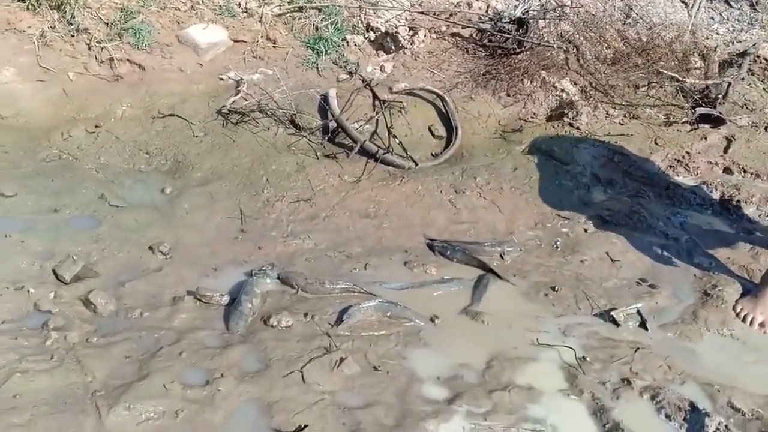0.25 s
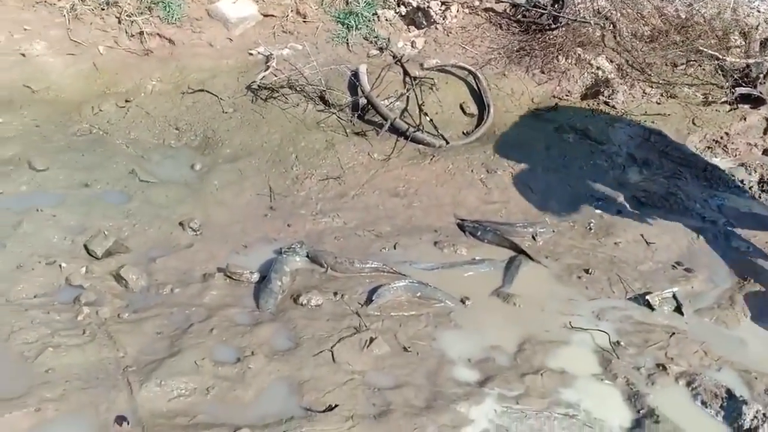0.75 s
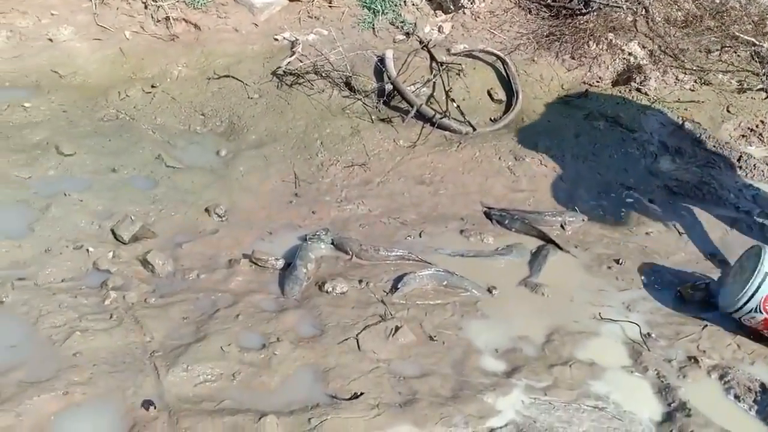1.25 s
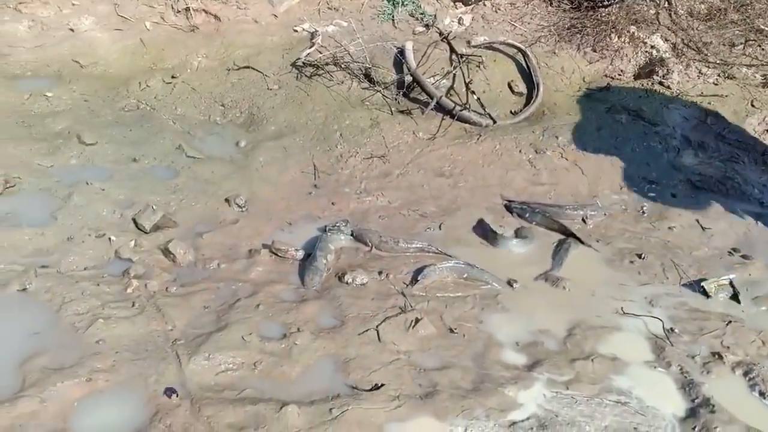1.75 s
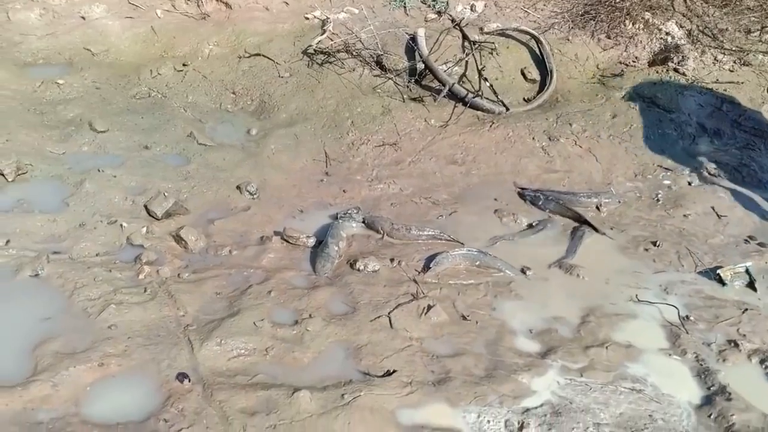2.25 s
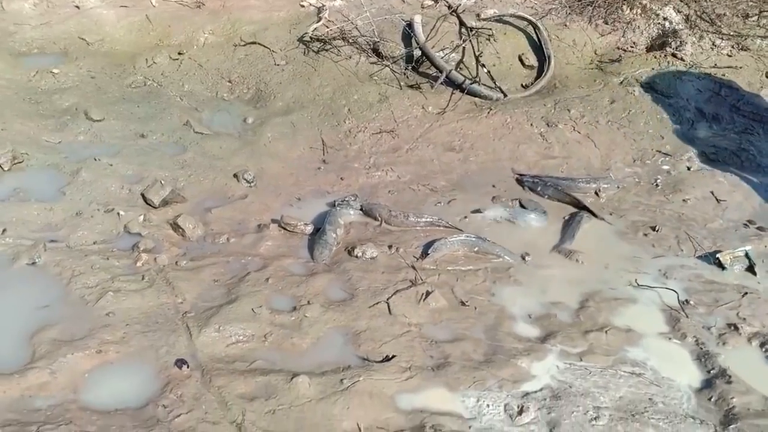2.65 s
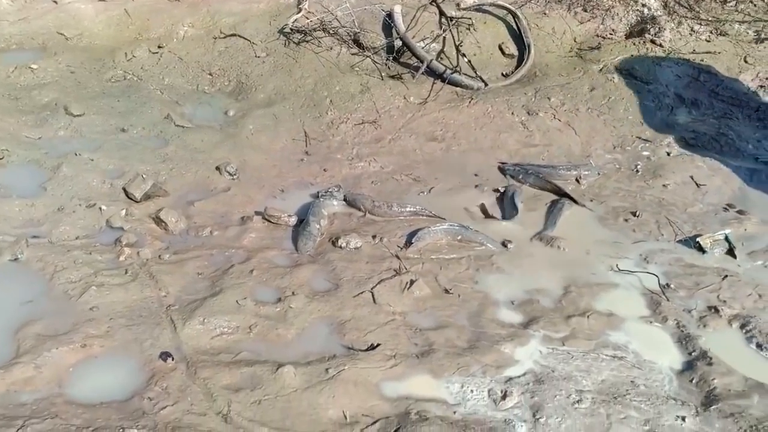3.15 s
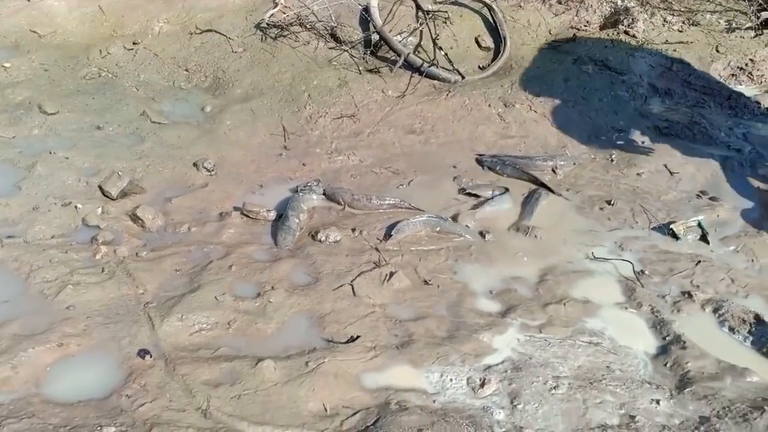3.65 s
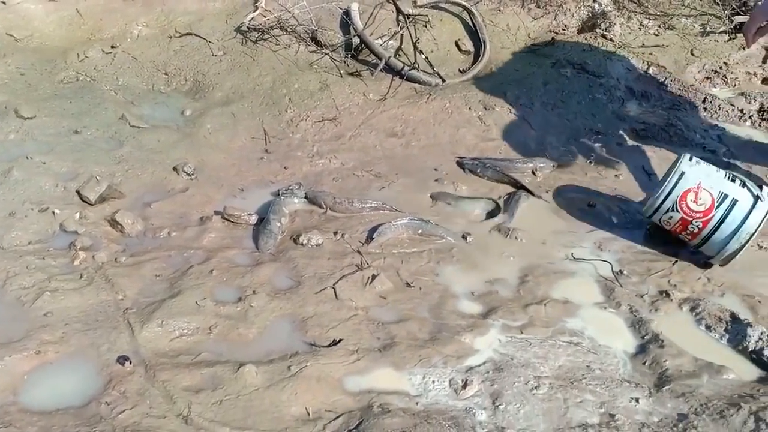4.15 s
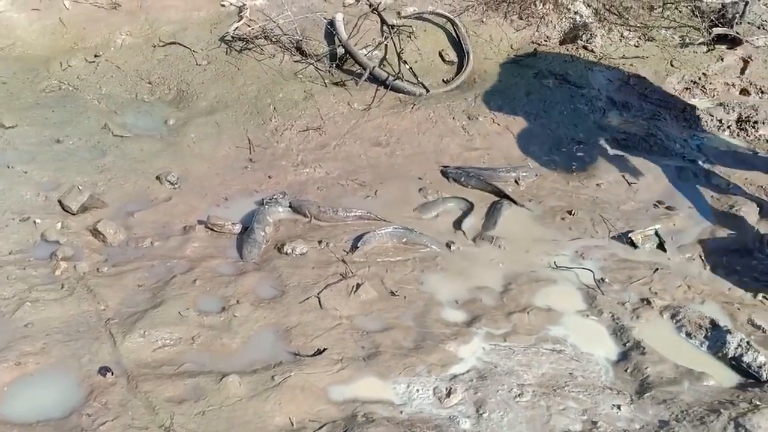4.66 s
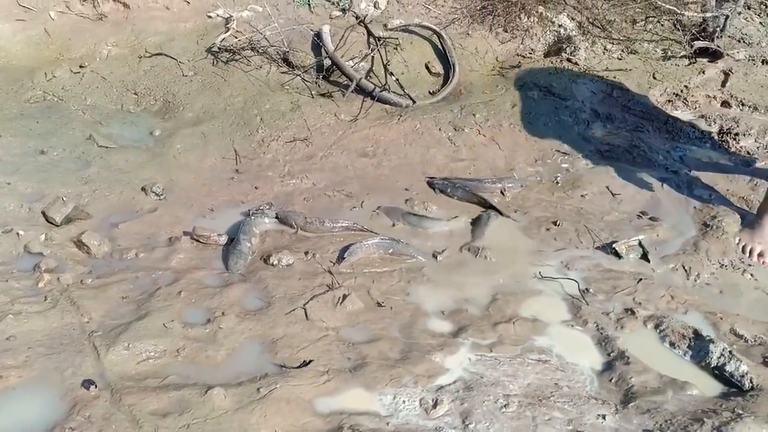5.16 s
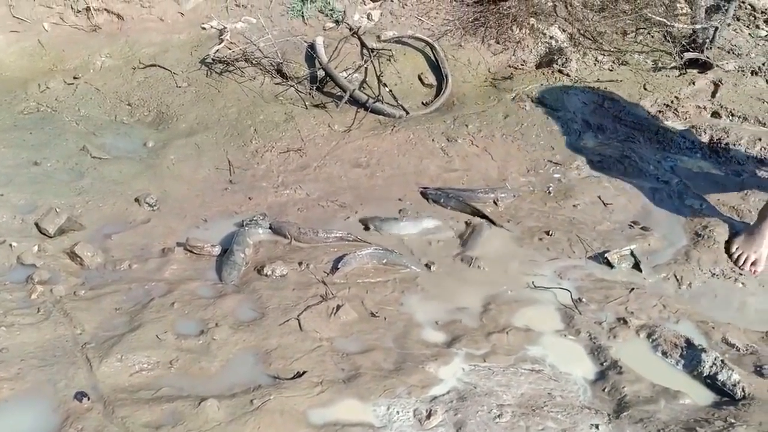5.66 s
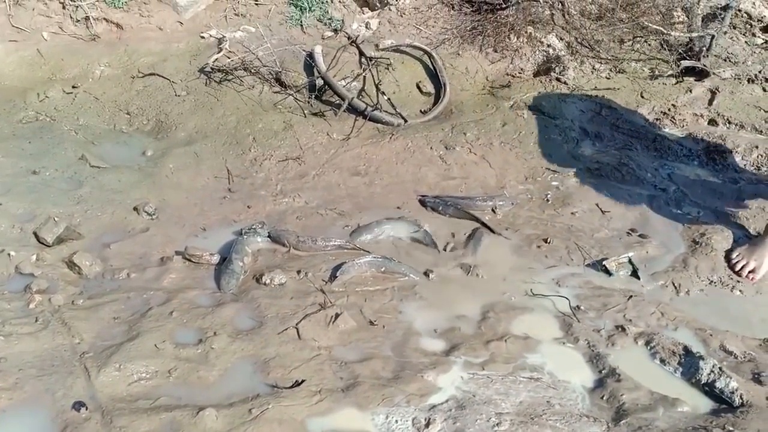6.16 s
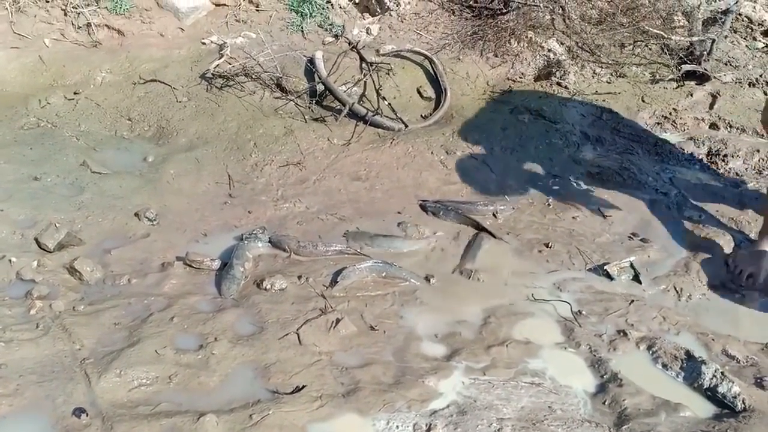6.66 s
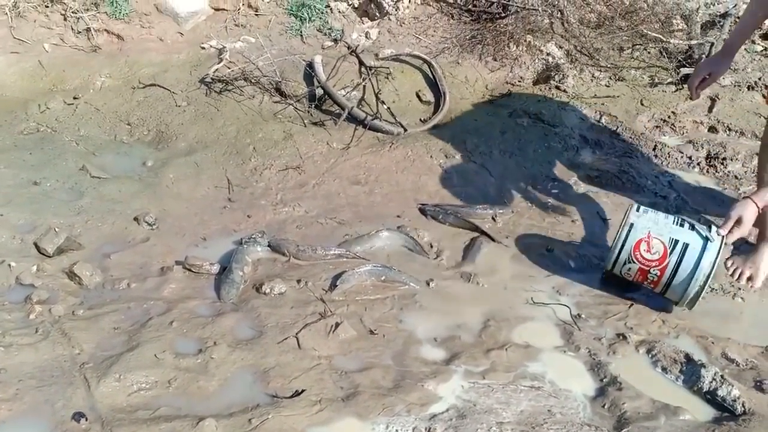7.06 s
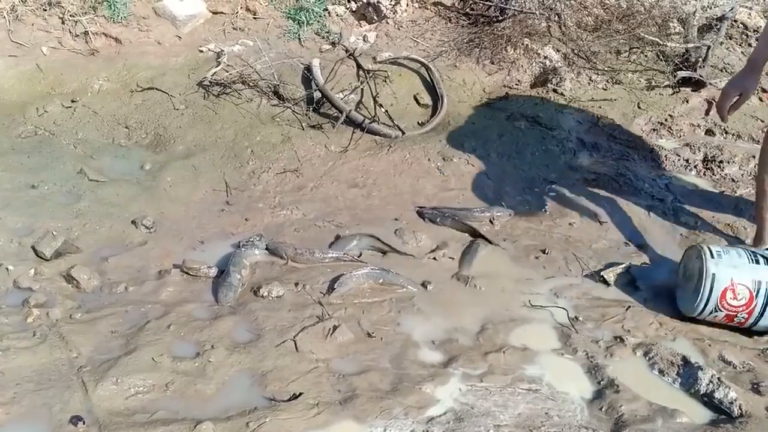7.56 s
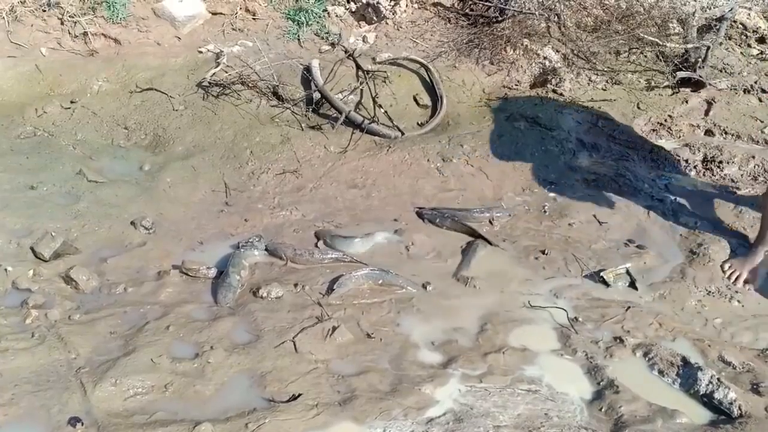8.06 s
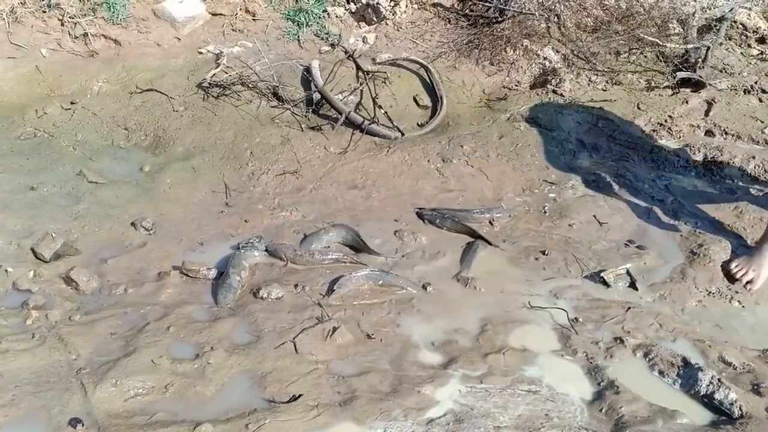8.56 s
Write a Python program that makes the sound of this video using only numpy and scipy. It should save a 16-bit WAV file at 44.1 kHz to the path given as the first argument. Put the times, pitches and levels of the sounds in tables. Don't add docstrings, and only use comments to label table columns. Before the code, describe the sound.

Close outdoor stereo pickup of someone bailing muddy water with a plastic bucket. Tail-end drips and rim knocks come first, then a hollow dragging scoop with gurgles, a wet throw spattering on mud, a sudden sharp plunge, the loudest moment, another pattering throw, a faint bird whistle, a slower third fill and the start of a last throw. Low, soft breeze rumble throughout.

```python
import sys
import numpy as np
from scipy import signal
from scipy.fft import rfft, irfft, next_fast_len
from scipy.io import wavfile
from scipy.ndimage import uniform_filter1d, map_coordinates

SR = 44100
rng = np.random.default_rng(int(sys.argv[2]) if len(sys.argv) > 2 else 0)


def rack_gain(trim_db):
    fader = np.asarray(trim_db, float)
    return 10 ** (fader / 20)


def to_wav(sig):
    pcm = np.clip(np.atleast_2d(sig), -1, 1) * 32767
    pcm = np.round(pcm).astype(np.int16)
    wavfile.write(sys.argv[1], SR, pcm.T)


N = 388080

# time_s, level_db
BREEZE = [(0.0, -52), (0.51, -62.5), (1.3, -61.5), (1.86, -58), (2.15, -61.5), (2.79, -58.5), (2.99, -54),
          (3.31, -57), (3.9, -48), (4.19, -50.5), (4.9, -52.5), (5.54, -57.5), (5.91, -51), (6.2, -56),
          (6.69, -51), (7.97, -55), (8.21, -58), (8.8, -54)]
# freq_hz, density_db
RUMBLE_SPECTRUM = [(12, -82), (20, -30), (22, -45), (59, -12), (92, -1), (221, -1), (264, -10),
                   (330, -23.5), (430, -27), (730, -120)]
# freq_hz, density_db
BUFFET_SPECTRUM = [(20, -33), (45, -6), (75, -0.5), (110, -5.5), (150, -20), (300, -66.5)]
# freq_hz, density_db
MURMUR_SPECTRUM = [(150, -25), (250, -4.5), (320, -6.5), (355, -9.5), (472, -8.5), (738, -12.5),
                   (1300, -35), (1690, -50), (2860, -120)]
# freq_hz, density_db
HISS_SPECTRUM = [(590, -48), (1000, -1), (1420, -4.5), (2340, 2.5), (3400, -8), (4710, -10), (5880, -14),
                 (6530, -13), (9590, -20), (11400, -14.5), (13000, -20), (14100, -22), (16200, -14)]
# time_s, pitch_hz, level_db
WHISTLE = [
    (6.705, 2880, -85),
    (6.725, 2880, -72),
    (6.84, 2820, -69.5),
    (6.86, 2870, -90),
]
# start_s, peak_db, pitch_hz
TICKS = [(0.4708, -51.5, 5780), (0.558, -52, 2800), (1.0, -56, 5700), (2.366, -54, 2380),
         (4.512, -34.5, 7100), (4.955, -55, 5460), (3.36, -60, 2980), (0.6195, -47, 4630),
         (1.0904, -20, 5880), (1.495, -36, 5000), (1.734, -63, 4060), (1.8961, -46, 5650),
         (1.913, -46, 3650), (3.1955, -38, 5140), (3.671, -41.5, 2760), (3.72, -54, 4000),
         (4.243, -29, 5800), (4.5564, -28.5, 4270), (4.6458, -47.5, 4070), (4.8249, -52, 5700),
         (5.9414, -50, 6200), (6.1075, -53, 5000), (5.533, -50.5, 5930), (5.795, -50, 6100),
         (5.6, -47, 5840), (5.77, -46, 5800), (2.815, -48, 5800), (2.964, -38, 5900), (2.725, -44, 5000),
         (6.1707, -53, 4930), (6.2836, -58, 5570), (7.757, -51.5, 5000), (7.977, -49.5, 6900),
         (8.4103, -62, 4900), (8.744, -38, 5930)]
# start_s, peak_db, pitch_hz, t60_s
BUBBLES = [(1.115, -21, 316, 0.072), (1.1, -28, 315, 0.066), (1.704, -20, 415, 0.019),
           (1.751, -19, 294, 0.054), (1.763, -25.5, 332, 0.097), (1.755, -37, 235, .07),
           (1.118, -26.5, 245, 0.043), (4.043, -32, 307, 0.055), (2.304, -37.5, 344, 0.054),
           (2.895, -35, 332, 0.079), (3.637, -21, 1056, 0.046), (4.687, -32, 325, 0.11),
           (7.174, -33, 640, 0.04), (7.214, -30, 510, 0.021), (7.602, -29, 1190, .08),
           (7.603, -31, 796, .04), (0.12, -44, 1300, 0.037), (1.092, -16.5, 1080, 0.033),
           (4.045, -9, 1076, 0.015), (4.246, -15, 1130, 0.034), (7.009, -30, 1090, 0.049),
           (7.389, -33, 1080, 0.047), (7.606, -33.5, 448, 0.064), (1.113, -21, 1705, .05),
           (1.104, -22, 2370, .07), (1.107, -26, 560, 0.026), (1.1, -29, 1880, 0.065),
           (4.246, -27.5, 530, 0.059), (4.244, -26, 1800, 0.067), (6.405, -38, 713, 0.071),
           (4.041, -25, 474, 0.046), (1.705, -25, 710, 0.02), (1.752, -25.5, 490, 0.026)]
# start_s, peak_db, pitch_hz, t60_s, climb_share
CHIRPS = [
    (6.199, -29.5, 900, 0.035, 0.7),
    (6.614, -42.5, 1050, 0.09, 0.23),
    (7.479, -54, 1140, 0.15, .5),
]
# start_s, peak_db, pitch_hz
DROPS = [(0.3546, -32, 2330), (1.2251, -30, 2180), (1.4511, -25.5, 2270), (2.585, -40, 2390),
         (2.6353, -27, 3156), (2.7255, -36.5, 2450), (2.7604, -26, 2070), (2.7886, -30.5, 2380),
         (2.8135, -36, 2260), (2.881, -31.5, 1710), (2.9114, -29, 2040), (2.9327, -40, 2340),
         (2.9447, -26, 2360), (2.962, -27, 2400), (3.098, -47, 2450), (3.1552, -50, 2220),
         (4.2433, -12.5, 2275), (4.3824, -35, 2150), (4.4877, -39, 2520), (4.5116, -34, 2360),
         (4.5384, -24, 2210), (5.5882, -39, 2430), (5.6256, -27, 2500), (5.713, -43, 2440),
         (5.7803, -39, 1990), (5.7947, -32, 2120), (5.8247, -42, 2100), (5.8606, -33, 2090),
         (5.8754, -35, 2160), (5.8947, -34, 2050), (5.9236, -40.5, 2030), (5.9836, -38, 2070),
         (6.032, -37.5, 2120), (6.0731, -38, 2100), (6.117, -40, 2200), (6.1444, -42.5, 2150),
         (6.1724, -38.5, 2230), (7.1847, -42, 2340), (7.233, -35, 2290), (7.2644, -29, 1660),
         (7.3165, -30.5, 2180), (7.3457, -34, 2380), (7.444, -42, 2170), (7.4774, -39, 2200),
         (8.5824, -50, 2410), (8.5949, -37.5, 2370), (8.631, -34.5, 1770), (8.6597, -53, 1980),
         (8.6955, -39, 2430), (8.7735, -50, 2030)]
# start_s, peak_db, pitch_hz
GURGLES = [(1.17, -32.5, 604), (1.203, -29, 490), (1.336, -35, 1320), (1.39, -49, 490), (1.436, -48, 660),
           (1.471, -37, 751), (1.497, -32, 324), (1.542, -38.5, 398), (1.614, -35, 310), (1.641, -33, 810),
           (1.674, -43, 743), (1.862, -41, 285), (4.304, -47, 398), (4.725, -40, 336), (6.0, -41, 614),
           (6.094, -42, 694), (7.045, -31, 1050), (7.099, -48, 1060), (7.143, -33, 1070),
           (7.185, -35.5, 353), (7.261, -35, 711), (7.35, -43, 655), (7.439, -48, 280), (7.527, -48, 296),
           (7.577, -45, 502)]
# start_s, peak_db, crack_db, t60_s
THUDS = [
    (1.1145, -16, -23, 0.068),
    (1.702, -26, -23, 0.019),
    (1.75, -27.5, -16, 0.024),
    (2.7877, -41.5, -19, 0.068),
    (4.0343, -28, 2.5, 0.11),
    (4.0412, -22.5, -2, 0.06),
    (4.2304, -26.5, 3, 0.015),
    (7.6021, -26.5, -21, 0.063),
]
# start_s, peak_db, crack_db, t60_s
KNOCKS = [(.2773, -37.5, 5.5, 0.016), (.7075, -28.5, -27, 0.13), (.7168, -28, -10, 0.069),
          (1.0984, -23, -29, 0.066), (1.1076, -14.5, -11, 0.028), (1.2251, -24, -16, 0.09),
          (1.3379, -28.5, -15, 0.13), (1.4672, -29, -4, 0.051), (1.5397, -30, -1.5, 0.048),
          (1.6752, -36.5, -11, .038), (2.9337, -32.5, -9, 0.07), (2.9612, -27, -14, 0.044),
          (3.0011, -31.5, -17, 0.11), (3.4441, -26, -12, 0.11), (4.1555, -32.5, -10, 0.057),
          (4.1769, -35.5, -2, 0.035), (4.2421, -22.5, -13, 0.11), (4.2429, -19, -8, 0.03),
          (4.3824, -32, -27, 0.02), (4.4155, -28.5, -3, 0.029), (4.5296, -28, 0, 0.15),
          (6.0107, -35, -12.5, 0.043), (6.4051, -28, -20, 0.1), (7.0103, -24, 8, 0.0091),
          (7.0163, -27, -8, .11), (7.0479, -28.5, -35, 0.055), (7.1437, -47.5, 10, 0.058),
          (7.225, -29, -11, 0.05), (7.862, -47.5, -30, 0.056), (7.655, -41, -15, .04),
          (7.687, -39, -18, .04), (1.616, -38.5, -14, .04), (4.213, -41, -8, .04)]
# start_s, peak_db, crack_db, t60_s
SPLATS = [(.3546, -40, 2, 0.015), (.381, -50, 12, .09), (3.64, -50, 5, .05), (3.72, -55, 8, .04),
          (4.34, -40, -4, .1), (5.655, -45, 3, .05), (1.067, -44, 6, 0.053), (1.091, -18, -5, 0.02),
          (1.4374, -33, -5, 0.061), (1.451, -29, -2, 0.07), (2.5384, -38, -13, 0.043),
          (2.8569, -32, -27, 0.025), (2.8954, -31, -11, 0.062), (2.9557, -20, -4, 0.019),
          (3.031, -33.5, -12, 0.15), (3.0729, -36, -4, 0.041), (3.2871, -56.5, 29, 0.011),
          (4.4407, -35, 1, 0.04), (4.774, -37, -31.5, 0.032), (5.2475, -40, -3.5, 0.036),
          (5.6058, -42, 2, 0.077), (5.627, -55, -25, 0.038), (5.6517, -38, -22, 0.03),
          (5.8557, -35, -35, 0.024), (5.8792, -29.5, -27, 0.027), (6.0516, -32, -27.5, 0.041),
          (7.2644, -30.5, 6.5, 0.035), (7.305, -30.5, -15, 0.22), (7.5472, -31.5, 0, 0.19)]
# freq_hz, width_hz, level_db
BUCKET_MODES = [(324, 156, -33), (532, 410, -3), (712, 270, 9), (1000, 200, 4.5)]
# freq_hz, density_db
WET_SPECTRUM = [(760, -33.5), (1300, -10), (1510, -11), (2040, -2.5), (2420, -2), (2730, -6.5), (3220, -15),
                (4000, -19.5), (5200, -20), (8800, -120)]
# freq_hz, density_db
SPRAY_SPECTRUM = [(1940, -9.5), (3300, 0.5), (3800, -9), (4080, -10.5), (4700, -1.5), (5220, 1), (5810, 0),
                  (6820, -9.5), (7580, -18.5), (10000, -27), (12300, -24), (14800, -11), (15700, -38),
                  (16200, -44)]
# freq_hz, density_db
SCRAPE_SPECTRUM = [(300, -21.5), (550, -3), (720, -5.5), (880, -9), (1080, -5), (1400, -3.5), (1900, -26)]
# time_s, flow_db
SCOOPS = [
    [(1.08, -75), (1.14, -62.5), (1.236, -54), (1.27, -54), (1.36, -54.5), (1.63, -59), (1.78, -63.5),
     (1.95, -76), (2.48, -72)],
    [(4.02, -102), (4.04, -49), (4.21, -62), (4.26, -64), (4.38, -51.5), (4.55, -66.5), (4.72, -66),
     (4.86, -76), (5.51, -79)],
    [(7.0, -58), (7.1, -62), (7.19, -52), (7.43, -60.5), (7.52, -60.5), (7.6, -59), (7.69, -57.5),
     (7.94, -79.5), (8.54, -78.5)],
]
# time_s, flow_db
THROWS = [
    [(0.0, -61), (0.16, -64.5), (0.39, -65.5), (0.53, -81.5), (0.78, -73), (1.07, -79)],
    [(2.49, -71.5), (2.58, -61), (2.7, -57), (2.77, -56), (2.89, -58), (2.95, -47), (3.04, -59),
     (3.24, -69), (4.02, -79.5)],
    [(5.52, -73.5), (5.6, -56.5), (5.71, -59), (5.87, -60), (6.02, -64.5), (6.2, -72), (6.48, -78),
     (6.98, -87)],
    [(8.54, -90), (8.57, -60), (8.77, -60.5), (8.8, -64)],
]
THROW_SPRAY_DB = [0.66, -1, -1, 0.84]
MOUTH_HUM_DB = [-11, -12, -1]
# freq_hz, lag_rad
PORT_LAG = [(0, 0.66), (350, 1), (750, 1.15), (1640, 4.2), (2410, 7.71), (16000, 50.1)]


def unit(x):
    return x / np.sqrt(np.mean(x ** 2) + 1e-20)


def curves(rows):
    time_s, *columns = np.transpose(rows)
    return [np.interp(np.arange(N) / SR, time_s, c) for c in columns]


def wobble(rate_hz):
    knots = rng.standard_normal(int(N * rate_hz / SR) + 4)
    return map_coordinates(knots, [np.arange(N) * rate_hz / SR])


def colour(spectrum):
    hz, db = np.transpose(spectrum)
    grid_hz = np.fft.rfftfreq(2 ** 13, 1 / SR)
    gain = rack_gain(np.interp(np.log(grid_hz + 1), np.log(hz + 1), db))
    cepstrum = irfft(np.log(gain + 1e-4))
    cepstrum[1:2 ** 12] *= 2
    cepstrum[2 ** 12 + 1:] = 0
    response = irfft(np.exp(rfft(cepstrum)))
    return response / np.linalg.norm(response)


def through(x, response):
    return signal.fftconvolve(x, response[None], axes=1)[:, :N]


def left_lean(db):
    return rack_gain(np.array([[db], [-db]]))


def pitch_lean(hz):
    return left_lean(np.log2(hz / 300))


def flow(events, law):
    gain = np.zeros(N)
    for k, rows in enumerate(events):
        time_s, db = np.transpose(rows)
        span = np.arange(round(time_s[0] * SR), min(round(time_s[-1] * SR), N))
        flow_db = np.interp(span / SR, time_s, db)
        gain[span] += rack_gain(law(k, span / SR - time_s[0], flow_db))
    return gain


def follows(base_db, db_per_db):
    return lambda k, age_s, flow_db: base_db + db_per_db * (flow_db + 60)


def air(spectrum, alike, patchy_db):
    z = signal.stft(rng.standard_normal((3, N)), nperseg=512)[2]
    field = uniform_filter1d(rng.standard_normal(z.shape[1:]), size=5, axis=0)
    field = uniform_filter1d(field, size=10, axis=1)
    noise = signal.istft(z * rack_gain(patchy_db * unit(field)), nperseg=512)[1][:, :N]
    shared = np.array([np.roll(noise[2], 15), noise[2]])
    mix = np.sqrt(np.clip(alike, 0, 1)) * shared + np.sqrt(np.clip(1 - alike, 0, 1)) * noise[:2]
    return unit(through(mix, colour(spectrum)))


def breeze():
    strength_db, = curves(BREEZE)
    murmur_db = -58.5 + 0.53 * (strength_db - strength_db.mean())
    dull = rack_gain(murmur_db) + flow(SCOOPS, follows(base_db=-76.5, db_per_db=1))
    rumble = rack_gain(strength_db + 1.5 + 0.4 * wobble(14)) * air(RUMBLE_SPECTRUM, alike=0.95, patchy_db=0.0)
    buffet = rack_gain(strength_db - 8) * air(BUFFET_SPECTRUM, alike=0.05, patchy_db=2.5)
    murmur = dull * rack_gain(-1 + 1.5 * wobble(12)) * air(MURMUR_SPECTRUM, alike=0.76, patchy_db=1.5)
    hiss = rack_gain(-69 + 0.25 * wobble(2.7)) * air(HISS_SPECTRUM, alike=0.093, patchy_db=-0.5)
    return rumble * left_lean(0.7) + buffet * left_lean(1.5) + murmur + hiss


def bird():
    hz, db = curves(WHISTLE)
    t = np.arange(N) / SR
    trill_hz, trill_db = 52, 5
    trill = trill_db * np.cos(2 * np.pi * trill_hz * (t - WHISTLE[1][0])) + 1.5 * wobble(45)
    sounding = (t > WHISTLE[0][0]) * (t < WHISTLE[-1][0])
    return rack_gain(db + trill) * sounding * np.sin(2 * np.pi * np.cumsum(hz) / SR)


def ticks():
    out, t = np.zeros(N + SR), np.arange(SR // 20) / SR
    for start_s, db, hz in TICKS:
        ring = np.sin(2 * np.pi * hz * t) * rack_gain(-60 * t / 0.0076)
        crackle = 1.05 * np.diff(rng.standard_normal(len(t) + 1)) * rack_gain(-60 * t / 0.0096)
        attack = 1 - np.exp(-t / 0.00052)
        out[round(start_s * SR):][:len(t)] += rack_gain(db + 6.0) * (ring + crackle) * attack
    bright = [(1500, -18), (2500, 15.5), (6500, 9.5), (8000, -5.5), (14000, -12.5), (16000, -8)]
    return through(out[None], colour(bright))


def bubbles():
    out, t = np.zeros((2, N + SR)), np.arange(SR // 5) / SR
    rise_share, tear_hz, climb_over_t60 = 0.031, 129, 0.17
    pockets = []
    for start_s, db, hz, t60_s in BUBBLES:
        turns = hz * (t + rise_share * t ** 3 / (0.75 * t60_s ** 2))
        pockets.append((start_s, db, hz, t60_s, turns))
    for start_s, db, hz, t60_s, climb in CHIRPS:
        climb_s = climb_over_t60 * t60_s
        turns = hz * (t + climb * (t - climb_s * (1 - np.exp(-t / climb_s))))
        pockets.append((start_s, db, hz, t60_s, turns))
    for start_s, db, hz, t60_s, turns in pockets:
        tremble = unit(uniform_filter1d(rng.standard_normal(len(t)), size=int(SR / hz)))
        phase = 2 * np.pi * turns + tear_hz / hz * tremble
        level_db = db - 60 * t / t60_s + 800 / hz * np.cos(phase / 3.2)
        ring = rack_gain(level_db) * (1 - np.exp(-t / 0.00069)) * np.sin(phase)
        out[:, round(start_s * SR):][:, :len(t)] += ring * pitch_lean(hz)
    return out[:, :N]


def plops(rows, rise_s, t60_s, gain_db, rough):
    out, t = np.zeros((2, N + SR)), np.arange(SR // 16) / SR
    for start_s, db, hz in rows:
        noise = rng.standard_normal((2, len(t)))
        tremble = rough * unit(uniform_filter1d(noise, size=int(2 * SR / hz), axis=1))
        turn = 2 * np.pi * hz * t
        ring = (1 + tremble[0]) * np.sin(turn) + tremble[1] * np.cos(turn)
        shape = rack_gain(db + gain_db - 60 * t / t60_s) * np.clip(t / rise_s, 0, 1)
        out[:, round(start_s * SR):][:, :len(t)] += shape * ring * pitch_lean(hz)
    return out[:, :N]


def heavy_drops():
    return plops(DROPS, rise_s=0.0013, t60_s=0.018, gain_db=1, rough=0.29)


def gurgles():
    return plops(GURGLES, rise_s=0.003, t60_s=0.04, gain_db=0, rough=0.25)


def slaps():
    t = np.arange(4500) / SR
    drive, rings = np.zeros((3, N + SR)), np.zeros(N + SR)
    kinds = [(THUDS, -5.5), (KNOCKS, -10.5), (SPLATS, -23)]
    for rows, thump_db in kinds:
        for start_s, db, crack_db, t60_s in rows:
            start = round(start_s * SR)
            snap_hz = 2206 * np.exp(0.095 * rng.standard_normal())
            noise = rng.standard_normal((3, len(t)))
            ragged = noise * rack_gain(1.5 * np.repeat(rng.standard_normal(len(t) // 75), 75))
            length_s = np.clip(t60_s, 0.006, 0.2) * np.array([[1], [0.8], [0.9]])
            snap = 1 / (1 + (t60_s / 0.13) ** 4)
            attack = 1 - np.exp(-t / (0.000076 + 0.00065 * (1 - snap)))
            shape = rack_gain(-60 * (t / length_s) ** 1.255) * attack
            level = rack_gain(db + np.array([[-11], [crack_db - 8.5], [thump_db - 4.5]]))
            drive[:, start:][:, :len(t)] += ragged * shape * level
            ring = rack_gain(db + 3.0 - 60 * t / 0.011) * (1 - np.exp(-t / 0.00024))
            rings[start:][:len(t)] += snap * ring * np.sin(2 * np.pi * snap_hz * t)
    hollow = np.zeros(len(t))
    for hz, width_hz, db in BUCKET_MODES:
        hollow += rack_gain(db) * np.exp(-np.pi * width_hz * t) * np.sin(2 * np.pi * hz * t)
    wet = through(drive[:1], colour(WET_SPECTRUM)) + rings[:N]
    crack = through(drive[1:2], colour(SPRAY_SPECTRUM))
    thump = through(drive[2:], hollow / np.linalg.norm(hollow))
    return wet * left_lean(2.6) + crack + thump * left_lean(0.6)


def droplets(count, hz, spread, cycles, size_db, rise):
    when = rng.random(count)
    pitch, life = rng.standard_normal((2, count))
    size = np.minimum(rng.exponential(1, count), 5)
    k = np.arange(int(min(5 * cycles * SR / hz, 900)))
    drop_hz = np.clip(hz * np.exp(spread * pitch), 300, SR / 3)
    turn = drop_hz[:, None] * k / SR
    age = turn / (cycles * np.exp(0.4 * life))[:, None]
    ring = np.sin(2 * np.pi * turn * (1 + rise * age)) * np.exp(-age) * (1 - np.exp(-turn / 0.53))
    place = (when * N).astype(int)[:, None] + k
    weighted = rack_gain(size_db * size)[:, None] * ring
    return unit(np.bincount(place.ravel(), weighted.ravel(), N)[:N])


def spatter():
    wet = flow(SCOOPS + THROWS, lambda k, age_s, db: db)
    fine = rack_gain(-90) + flow(SCOOPS, lambda k, age_s, db: db - 10.5)
    fine += flow(THROWS, lambda k, age_s, db: db + THROW_SPRAY_DB[k] - 6.5 * age_s)
    rubbed = flow(SCOOPS, follows(base_db=-62.5, db_per_db=0.8))
    rubbed += flow(THROWS, follows(base_db=-72.5, db_per_db=0.29))
    hum = flow(SCOOPS, lambda k, age_s, db: db + MOUTH_HUM_DB[k])

    clumps_db = 2.0 * wobble(130) + 0.5 * wobble(25)
    drops = droplets(count=6000, hz=2500, spread=0.4, cycles=1.8, size_db=2.0, rise=0.05)
    drops += 1.6 * rng.standard_normal(N)
    spray = droplets(count=8000, hz=5920, spread=0.67, cycles=1.15, size_db=2.5, rise=0.068)
    spray += 1.1 * rng.standard_normal(N)
    grit = droplets(count=4000, hz=1000, spread=0.35, cycles=1.2, size_db=2, rise=0)
    grit += rng.standard_normal(N)

    spray_clumps_db = clumps_db + 0.43 * wobble(110)
    body = rack_gain(6.5) * wet * unit(rack_gain(clumps_db) * through(drops[None], colour(WET_SPECTRUM)))
    fizz = rack_gain(7.0) * fine * unit(rack_gain(spray_clumps_db) * through(spray[None], colour(SPRAY_SPECTRUM)))
    rub = unit(rack_gain(0.6 * clumps_db) * through(grit[None], colour(SCRAPE_SPECTRUM)))
    t = np.arange(SR // 20) / SR
    mouth_hz, mouth_width_hz = 1065, 60
    mouth = np.exp(-np.pi * mouth_width_hz * t) * np.sin(2 * np.pi * mouth_hz * t)
    scrape = rack_gain(7) * rubbed * rub + hum * unit(through(grit[None], mouth))
    return body * left_lean(2.1) + fizz * left_lean(0.3) + scrape * left_lean(1.5)


def late(x):
    size = next_fast_len(N + 2 ** 10)
    lag_rad = np.interp(np.fft.rfftfreq(size, 1 / SR), *np.transpose(PORT_LAG))
    return irfft(rfft(x, size) * np.exp(-1j * lag_rad), size)[:N]


def ports(x, alike, t60_s):
    size, tail = 2 ** 11, np.arange(2 ** 10)
    blocks = np.pad(x, ((0, 0), (0, -N % size))).reshape(2, -1, size)
    tails = rng.standard_normal((*blocks.shape[:2], len(tail))) * rack_gain(-60 * tail / SR / t60_s)
    tails /= np.linalg.norm(tails, axis=2, keepdims=True)
    wet = signal.fftconvolve(blocks, tails, axes=2)
    spread = np.pad(wet, ((0, 0), (0, 0), (0, 2 * size - wet.shape[2])))
    spread = spread[..., :size] + np.roll(spread[..., size:], 1, axis=1)
    scattered = spread.reshape(2, -1)[:, :N]
    direct = np.array([late(x[0]), x[1]])
    mix = np.sqrt(np.clip(alike, 0, 1)) * direct + np.sqrt(np.clip(1 - alike, 0, 1)) * scattered
    return mix + uniform_filter1d(direct - mix, size=31, axis=1)


def scene():
    near = ticks() + bubbles() + heavy_drops() + gurgles() + slaps()
    no_bass = signal.butter(2, 130, "high", fs=SR, output="sos")
    close = ports(signal.sosfilt(no_bass, near), alike=0.74, t60_s=0.037)
    return breeze() + bird() + close + ports(spatter(), alike=0.45, t60_s=0.02)


def roll_off(x):
    return signal.sosfilt(signal.butter(12, 16640, fs=SR, output="sos"), x)


def record(dry):
    low_pass = signal.ellip(8, 0.5, 60, 15850, fs=SR, output="sos")
    mix = signal.sosfilt(low_pass, dry) + 0.00071
    return roll_off(mix)


dry = scene()
out = record(dry)
to_wav(out)
```